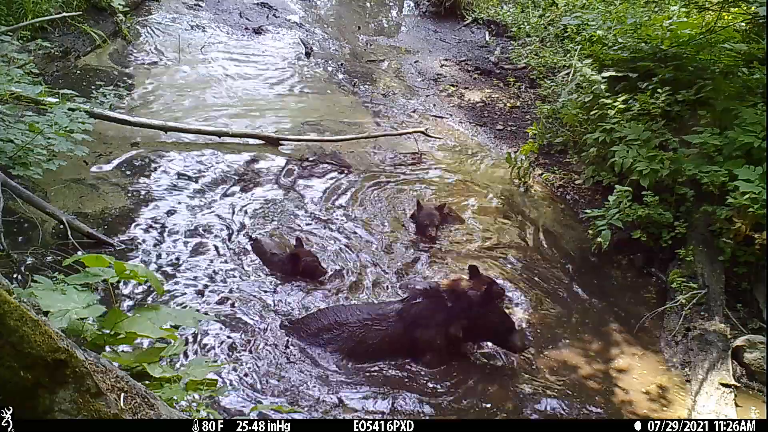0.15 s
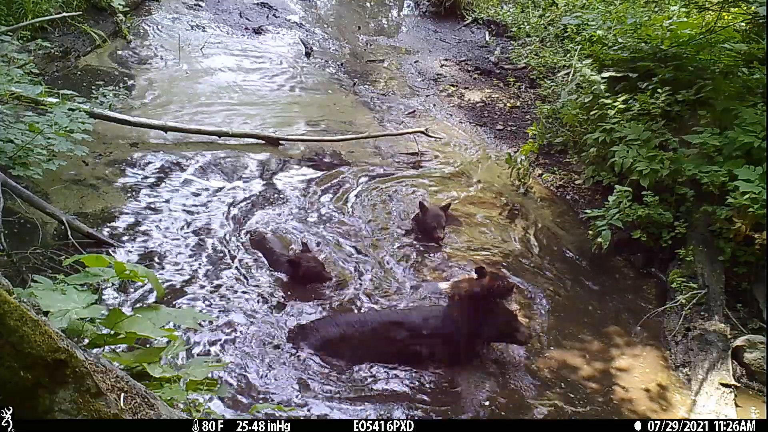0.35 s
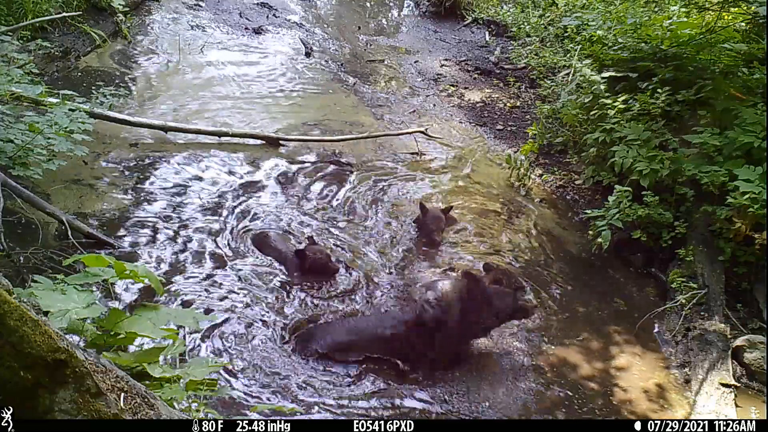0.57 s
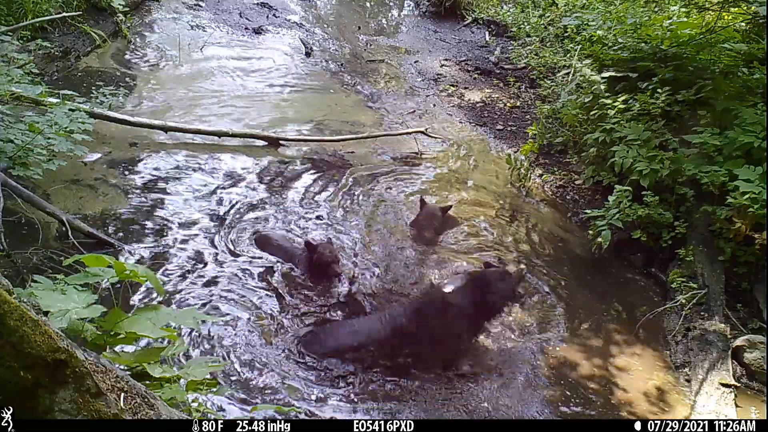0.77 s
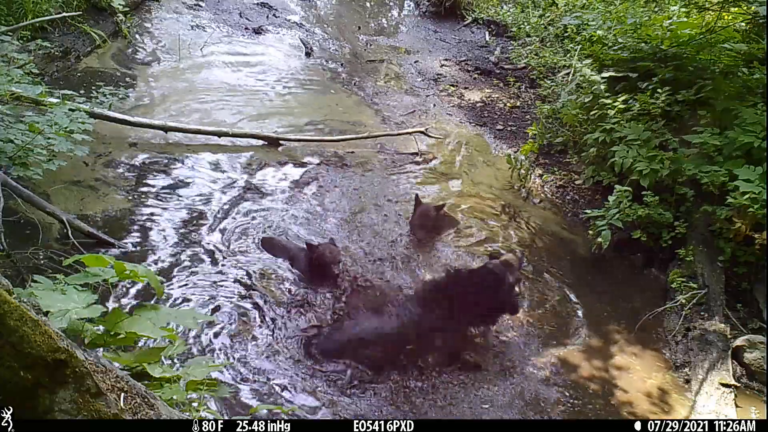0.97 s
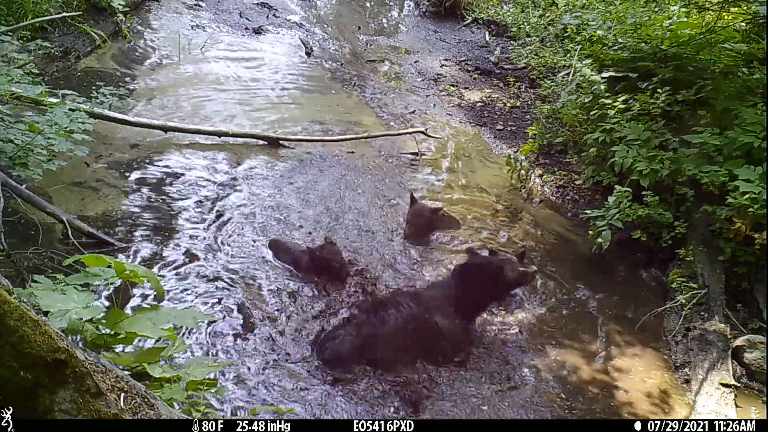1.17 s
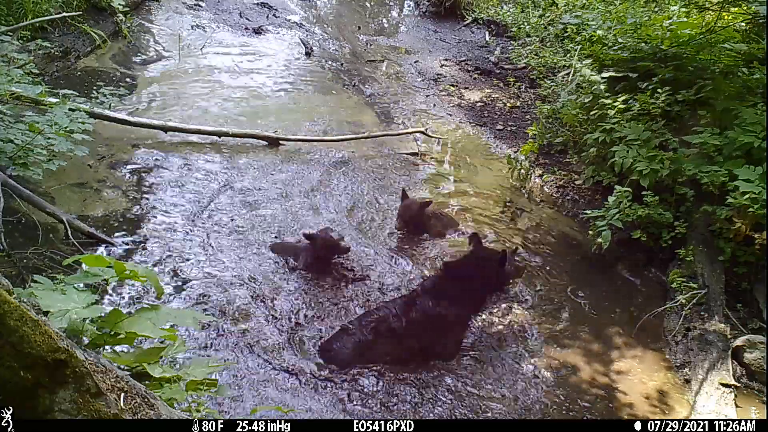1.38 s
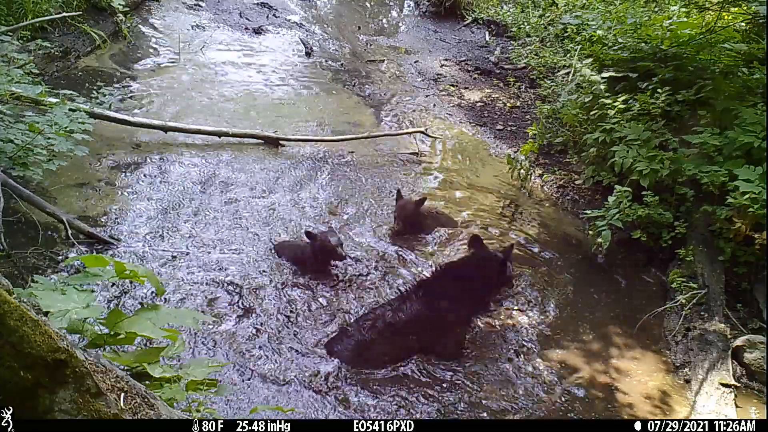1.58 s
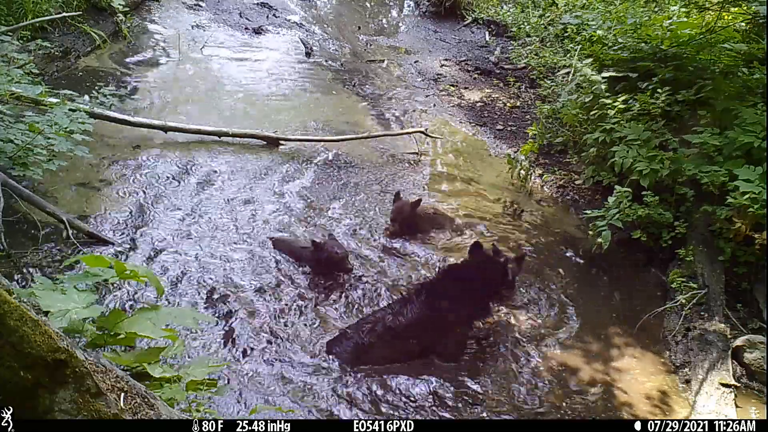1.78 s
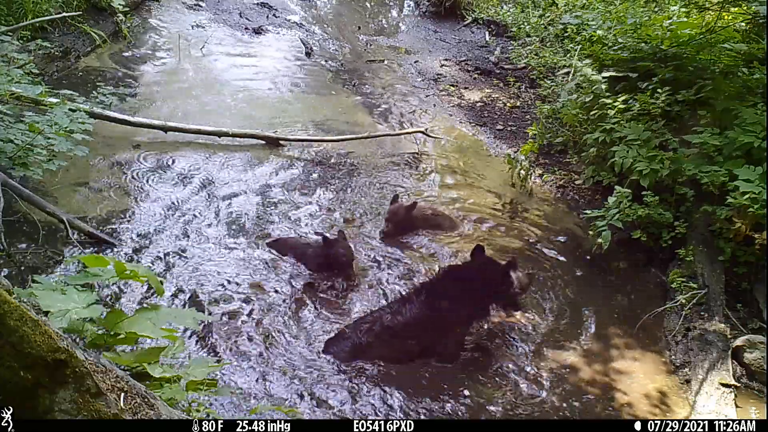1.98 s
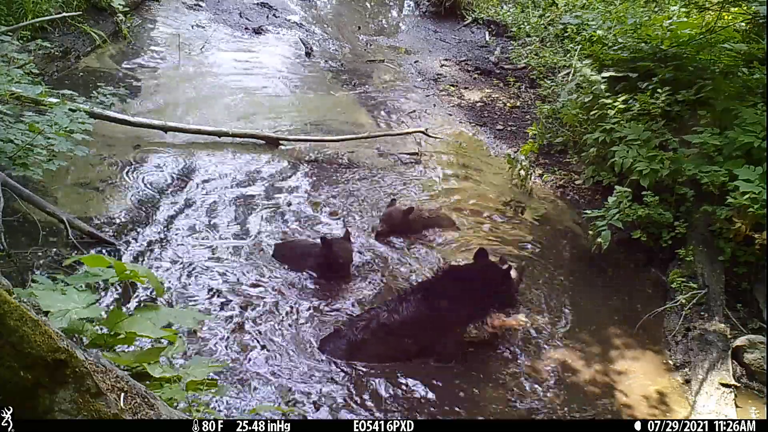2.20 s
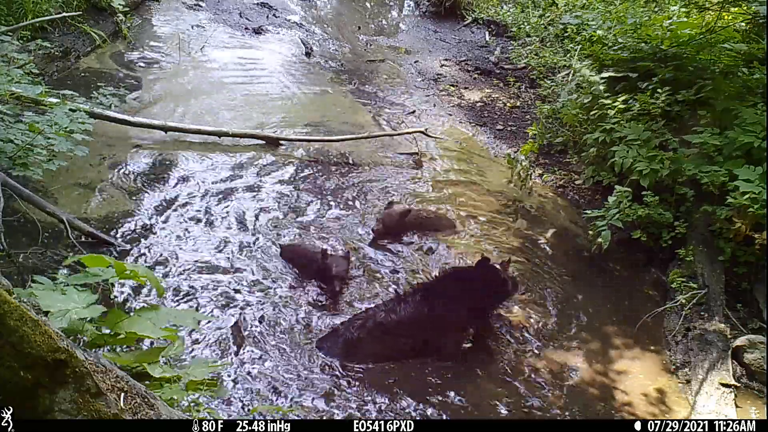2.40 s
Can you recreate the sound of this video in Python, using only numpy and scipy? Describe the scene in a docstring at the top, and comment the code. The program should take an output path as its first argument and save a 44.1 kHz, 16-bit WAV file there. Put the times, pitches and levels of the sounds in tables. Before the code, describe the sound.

Water spray patters onto a shallow stream as a wet bear shakes, with plips and sloshing

```python
"""Spray patters on a shallow stream as a bear shakes its wet head and its cubs paddle nearby.
The spray is thousands of drops and tiny ringing bubbles over a noise mist, with sharp single plips
and short bright swells of band noise. Stirred water sloshes (larger bubbles and noise), plops (tones
gliding slightly upward, one a high drip ring) and gurgles (pitch sweeps).
A thin bank echo and a faint steady hiss lie behind; a trail camera hears it through its housing port."""
import sys
import numpy as np
from scipy import signal
from scipy.io import wavfile
from scipy.ndimage import uniform_filter1d

SR = 44100
rng = np.random.default_rng(int(sys.argv[2]) if len(sys.argv) > 2 else 0)


def wrap_up_sound(samples):
    """Save the sound to the file named by the first command line argument, as 16-bit audio."""
    columns = np.atleast_2d(samples).T
    # keep every value between -1 and 1, then stretch to whole-number steps
    tamed = np.clip(columns, -1, 1)
    steps = np.round(tamed * 32767).astype(np.int16)
    wavfile.write(sys.argv[1], SR, steps)


N = 108045


def amp(db):
    """Decibels to gain."""
    return 10 ** (np.asarray(db) / 20)


def unit(x):
    """Scales to rms 1."""
    return x / np.sqrt(np.mean(x ** 2) + 1e-20)


def read(points, hz):
    """Interpolates a table on a log-frequency axis."""
    f, value = np.transpose(points)
    return np.interp(np.log(hz + 1), np.log(f + 1), value)


def level(points):
    """Gain over time from a dB curve."""
    return amp(np.interp(np.arange(N) / SR, *np.transpose(points)))


def add(mix, start_s, sound):
    """Mixes a sound in at start_s, cut at the end of the mix."""
    part = mix[max(round(start_s * SR), 0):][:len(sound)]
    part += sound[:len(part)]


def colour(x, points, notches=()):
    """Causal minimum-phase filter with the given response."""
    hz = np.fft.rfftfreq(4096, 1 / SR)
    db = read(points, hz)
    for f, half_width_hz, depth_db in notches:
        db = db - depth_db / (1 + ((hz - f) / half_width_hz) ** 2)
    log_gain = np.log(amp(np.r_[db, db[-2:0:-1]]))
    taps = np.fft.ifft(np.exp(np.conj(signal.hilbert(log_gain)))).real
    return signal.oaconvolve(x, taps[:len(hz)])[:N]


def noise_band(edge_hz, kind, length):
    """White noise through a second-order Butterworth design, rms 1."""
    sos = signal.butter(2, edge_hz, kind, fs=SR, output="sos")
    return unit(signal.sosfilt(sos, rng.standard_normal(length)))


# Hiss spectrum: f/Hz, level/dB
HISS_COLOUR = [(20, 4.5), (450, 8), (1000, 4), (2000, -4), (3300, -4.5), (5000, 1), (8000, 2.5), (11500, 0),
               (15500, -2.5)]
HISS_DB = -52


def hiss():
    """Steady background: stationary noise with a fixed spectrum."""
    return amp(HISS_DB) * unit(colour(rng.standard_normal(N), HISS_COLOUR))


# Reverberation of banks and trees: f/Hz, t60/s
BANKS_T60 = [(300, 0.17), (3000, 0.55), (10000, 0.093)]
BANKS_DB = -17


def banks(x):
    """Thin diffuse echo of banks and foliage: noise decaying at its own rate in each band."""
    hz, t, z = signal.stft(rng.standard_normal(SR // 2), SR, nperseg=256)
    decay = amp(-60 * t / read(BANKS_T60, hz)[:, None])
    tail = signal.istft(z * decay, SR)[1]
    return amp(BANKS_DB) * signal.fftconvolve(x, tail / np.linalg.norm(tail))[:N]


# Short bright swells in the spray: t/s, length/s, level/dB, f/Hz
BRIGHT_SWELLS = [(0.211, 0.028, -50.5, 4940), (0.568, 0.039, -46.5, 7540), (1.287, 0.023, -42, 4200),
                 (1.549, 0.082, -53, 4200), (1.866, 0.0044, -44.5, 5830)]
SWELL_EDGE_RATIO = 1.155  # band edge to centre


def bright_swells():
    """Short bright swells of band noise in the spray, each under a half-sine."""
    out = np.zeros(N)
    for start_s, length_s, db, hz in BRIGHT_SWELLS:
        u = np.arange(0, 1, 1 / (length_s * SR))
        noise = noise_band([hz / SWELL_EDGE_RATIO, hz * SWELL_EDGE_RATIO], "band", SR)[:len(u)]
        add(out, start_s, amp(db) * np.sin(np.pi * u) * noise)
    return out


# Filling cavities: t/s, length/s, level/dB, start f/Hz, end f/Hz
GURGLE_SWEEPS = [(.188, .018, -51, 2650, 2050), (.984, .04, -42, 1350, 1800),
                 (1.7635, .037, -46, 600, 2100), (1.811, .034, -48, 490, 980),
                 (1.9734, .036, -50.5, 730, 1870)]
GURGLE_ROUGHNESS = .35  # rms flutter, ratio to mean gain


def gurgles():
    """A cavity changes size as it fills, so its pitch slides, mostly upward, with uneven level."""
    out = np.zeros(N)
    for start_s, length_s, db, start_hz, end_hz in GURGLE_SWEEPS:
        u = np.arange(0, 1, 1 / (length_s * SR))
        slow_noise = unit(uniform_filter1d(rng.standard_normal(SR), size=90))[:len(u)]
        flutter = 1 + GURGLE_ROUGHNESS * slow_noise
        pitch_hz = start_hz * (end_hz / start_hz) ** u
        tone = np.sin(2 * np.pi * np.cumsum(pitch_hz) / SR)
        swell = np.sqrt(abs(np.sin(np.pi * u)))
        add(out, start_s, amp(db) * swell * flutter * tone)
    return out


# Plops and one high drip ring: t/s, level/dB, f/Hz
PLOP_TONES = [(.262, -40, 830), (0.281, -42, 1130), (0.306, -40, 1746), (0.379, -42, 1595),
              (0.499, -31.5, 1235), (0.831, -34.5, 867), (.857, -36.5, 750), (.877, -35.5, 578),
              (.918, -25.5, 1516), (1.0, -38.5, 558), (1.09, -38, 552), (1.133, -42, 510),
              (1.161, -29, 1450), (1.315, -40.5, 590), (1.413, -34.5, 1340), (1.455, -35.5, 812),
              (1.619, -43.5, 1070), (1.717, -37.5, 584), (1.752, -45, 338), (1.924, -46, 3110),
              (1.983, -41.5, 564)]
PLOP_RISE_S, PLOP_DECAY_S, PLOP_GLIDE_PER_S = 0.0012, 0.0054, 3.5


def plops():
    """Plops and one high drip ring: soft-start decaying tones gliding slightly upward."""
    out, t = np.zeros(N), np.arange(SR // 10) / SR
    envelope = (1 - np.exp(-t / PLOP_RISE_S)) * np.exp(-t / PLOP_DECAY_S)
    glided_t = t + PLOP_GLIDE_PER_S * t ** 2 / 2
    for start_s, db, hz in PLOP_TONES:
        add(out, start_s, amp(db) * envelope * np.sin(2 * np.pi * hz * glided_t))
    return out


def bubble(hz, decay_cycles, glide, tick):
    """Impact tick, then a decaying ring; pitch rises by the ratio glide per decay time."""
    age = np.arange(int(6 * decay_cycles / hz * SR) + 2) * hz / decay_cycles / SR  # decay times
    pitch_hz = hz * (1 + glide * age)
    ring = np.exp(-age) * np.sin(2 * np.pi * np.cumsum(pitch_hz) / SR)
    ring[0] += tick
    return ring


BUBBLE_MAX_GLIDE = 0.111
THINNING = .34  # rate follows level to this power


def bubbles(flow, peak_per_s, spread_db, low_hz, high_hz, cycles, tick, count):
    """Random swarm of bubbles in count sizes; calmer water has fewer."""
    share = (flow / flow.max()) ** THINNING
    chance, kind = rng.random(N), rng.integers(0, count, N)
    strength = amp(spread_db * np.minimum(rng.exponential(1, N), 3))
    struck = chance < share * peak_per_s / SR
    hits = strength * rng.choice([-1, 1], N) * struck / np.sqrt(share)  # evens out the power
    out = np.zeros(N)
    for k, hz in enumerate(np.geomspace(low_hz, high_hz, count)):
        decay_cycles = cycles * 2 ** rng.uniform(-0.71, 1)
        ring = bubble(hz, decay_cycles, BUBBLE_MAX_GLIDE * rng.random(), tick)
        out += signal.oaconvolve(hits * (kind == k), ring * hz / high_hz)[:N]
    return unit(out)


# Water stirred by the bodies: t/s, level/dB
SLOSH_LEVEL = [(0, -73), (.15, -59.5), (.275, -52), (.32, -69), (.37, -54.5), (.43, -60.5), (.49, -48),
               (.54, -51.5), (.72, -46.5), (.8, -44.5), (.93, -44), (1.02, -42), (1.06, -45.5), (1.19, -40),
               (1.27, -50), (1.42, -50.5), (1.51, -55), (1.72, -57), (1.79, -50), (1.87, -60),
               (2.02, -56.5), (2.2, -62), (2.26, -60.5), (2.4, -66)]
# Slosh filter: f/Hz, level/dB
SLOSH_FILTER = [(100, -33.5), (300, -13.5), (550, -7.5), (850, -6.5), (1150, 0.5), (1600, 3.5), (2200, -5),
                (3500, -2), (8000, -41.5)]
SLOSH_PEAK_PER_S, SLOSH_SPREAD_DB, SLOSH_CYCLES = 1300, 3.5, 5.92
WASH_DB = -9  # re bubbles


def slosh():
    """Stirred water: a swarm of larger bubbles plus a soft noise wash."""
    flow = level(SLOSH_LEVEL)
    swarm = bubbles(flow, SLOSH_PEAK_PER_S, SLOSH_SPREAD_DB, 450, 2600, SLOSH_CYCLES, tick=0, count=36)
    wash = unit(colour(rng.standard_normal(N), SLOSH_FILTER))
    return flow * unit(unit(colour(swarm, SLOSH_FILTER)) + amp(WASH_DB) * wash)


# Big drops hitting the water: t/s, level/dB, bubble f/Hz, spatter level/dB re bubble
BIG_DROPS = [(.202, -32, 1880, -20), (0.2086, -16, 3500, -15), (0.21, -18.5, 4170, -14.5),
             (0.331, -30.5, 3220, -11), (0.3323, -26, 2660, -14), (0.34, -30, 3280, -7),
             (.348, -29, 3260, -6), (0.3718, -35.5, 2200, -18), (0.4288, -31.5, 3270, -7),
             (0.4662, -20, 3100, -16), (0.4669, -18.5, 3250, -10), (0.566, -27.5, 2920, -1.5),
             (0.6156, -31.5, 2900, -1.5), (.6568, -30, 3030, -6), (0.7103, -21, 2780, -10.5),
             (.7642, -20, 3300, -20), (0.786, -25, 3920, -3), (0.8759, -12.5, 3730, -20),
             (0.9442, -27, 3260, -14), (.9762, -29, 3300, -9), (0.9942, -18, 3240, -19),
             (1.0084, -18.5, 3150, -28), (1.0204, -19, 2130, -30), (1.0233, -19.5, 2920, -11),
             (1.0693, -18.5, 3180, -18), (1.0863, -25, 3400, -9), (1.087, -21, 3020, -9),
             (1.145, -20.5, 2400, -8), (1.1952, -32, 3000, 0), (1.2437, -16, 2780, -18.5),
             (1.275, -29, 2040, -22), (1.3175, -25.5, 1950, -9), (1.397, -28, 2100, -7),
             (1.414, -21.5, 3550, -12.5), (1.4313, -31, 2110, -14), (1.4857, -30, 3530, -16),
             (1.536, -34, 2130, -21), (1.695, -42, 2430, -16.5), (1.7228, -36, 2600, -9),
             (1.75, -33, 1730, -19), (1.7532, -29, 3270, -7), (1.7602, -26, 2660, -15),
             (1.7793, -37, 2230, -13), (1.8069, -28.5, 3300, -21), (1.8074, -32, 1830, -11),
             (1.8163, -25.5, 3600, -22), (1.822, -40, 2000, -6), (1.8634, -37, 3020, -11),
             (1.8699, -29.5, 3660, -9), (2.0214, -36.5, 1750, -6), (2.1647, -38, 2850, -4),
             (2.2407, -36, 2920, -16), (2.249, -42, 1600, -5), (2.4455, -33.5, 1150, -15)]
# Drop filter: f/Hz, level/dB
DROP_FILTER = [(100, -13), (500, -6.5), (1200, -1), (4500, 0.5), (6500, -2.5), (9000, -9.5), (15500, -41)]
DROP_CYCLES, DROP_GLIDE, DROP_TICK, DROP_RISE_S = 2.55, 0.016, .2, .0002
SPATTER_DECAY_S, SPATTER_ROUGH_DB = 0.0062, 2.5


def big_drops():
    """Sharp plips out of the spray: a ringing bubble and a quick noise spatter of droplets."""
    out, t = np.zeros(N), np.arange(SR // 20) / SR
    attack = 1 - np.exp(-t / DROP_RISE_S)
    for start_s, db, hz, spatter_db in BIG_DROPS:
        grit, size = rng.standard_normal((2, len(t)))
        spatter = unit(grit * amp(SPATTER_ROUGH_DB * size))
        plip = amp(spatter_db) * spatter * np.exp(-t / SPATTER_DECAY_S)
        add(plip, 0, bubble(hz, DROP_CYCLES, DROP_GLIDE, DROP_TICK))
        add(out, start_s, amp(db) * attack * plip)
    return colour(out, DROP_FILTER)


# Spray landing on the stream: t/s, level/dB
SPRAY_LEVEL = [(0, -67), (.15, -61), (.2, -49.5), (.225, -50.5), (.32, -59), (.345, -47), (.405, -53),
               (.45, -47.5), (.48, -43), (.6, -41), (.71, -40), (.84, -38), (.97, -36), (1.005, -31.5),
               (1.04, -37), (1.15, -38.5), (1.27, -41.5), (1.42, -41), (1.5, -53), (1.6, -51.5),
               (1.71, -57.5), (1.78, -49.5), (1.85, -55.5), (1.93, -56.5), (2.1, -59.5), (2.45, -67.5)]
# Spray filter: f/Hz, level/dB
SPRAY_FILTER = [(100, -61), (500, -53), (1000, -1), (1600, -4), (2400, 3.5), (3400, 6.5), (4600, -1.5),
                (6500, -9.5), (10000, -21.5), (15500, -33)]
SPRAY_PEAK_PER_S, SPRAY_SPREAD_DB, SPRAY_CYCLES, SPRAY_TICK = 2300, 2.1, 3.8, 1
MIST_DB, MIST_HZ = 12.5, 5480  # re drops before the filter; high-pass edge
CLUMP_DB, CLUMP_HZ = 2, 60  # rms level swing; centre rate


def spray():
    """Drops flung from the fur land in clumps, over a mist of droplets too fine to tell apart."""
    flow = level(SPRAY_LEVEL)
    drops = bubbles(flow, SPRAY_PEAK_PER_S, SPRAY_SPREAD_DB, 1255, MIST_HZ, SPRAY_CYCLES, SPRAY_TICK, count=40)
    clump_db = CLUMP_DB * noise_band([CLUMP_HZ / 2, CLUMP_HZ * 2], "band", N)
    mist = amp(MIST_DB + clump_db / 2) * noise_band(MIST_HZ, "high", N)
    patter = unit(amp(clump_db) * drops) + mist
    return flow * unit(colour(patter, SPRAY_FILTER))


def scene():
    """All the water with its echo, over the hiss."""
    water = spray() + slosh() + bright_swells() + big_drops() + plops() + gurgles()
    background = hiss()
    return (water + banks(water) + background)[None]


# Housing response: f/Hz, level/dB
HOUSING_RESPONSE = [(100, -10.5), (1500, -2.5), (1750, -3), (2050, 2.5), (2800, -0.5), (3230, 2.5),
                    (3800, -3.5), (5000, -8.5), (5900, -11), (7000, -12.5), (10000, -13.5), (15500, -19)]
# Housing notches: f/Hz, half-width/Hz, depth/dB
HOUSING_NOTCHES = [(5490, 110, 14.6), (10920, 200, 8), (13100, 270, 3.3)]
BAND_EDGE_HZ = 15720


def record(dry):
    """The housing and its port colour the sound; a steep low-pass then limits the band."""
    heard = colour(dry[0], HOUSING_RESPONSE, HOUSING_NOTCHES)
    low_pass = signal.firwin(801, BAND_EDGE_HZ, window=("kaiser", 9), fs=SR)
    return signal.oaconvolve(heard, low_pass, "same")[None]


dry = scene()
out = record(dry)
wrap_up_sound(out)
```